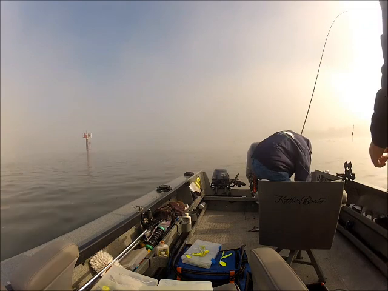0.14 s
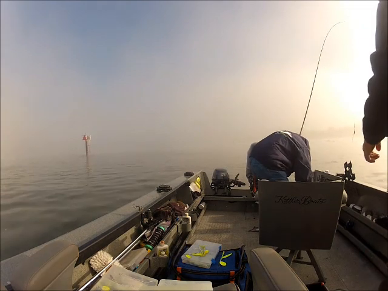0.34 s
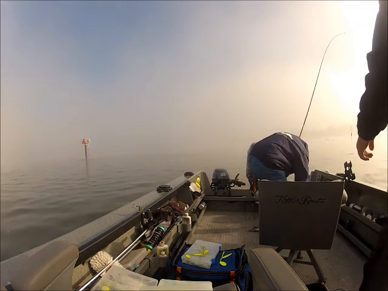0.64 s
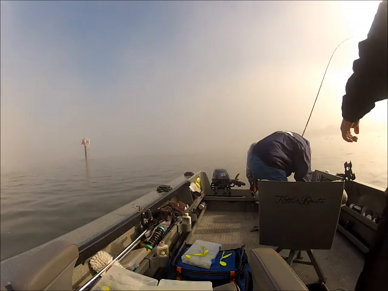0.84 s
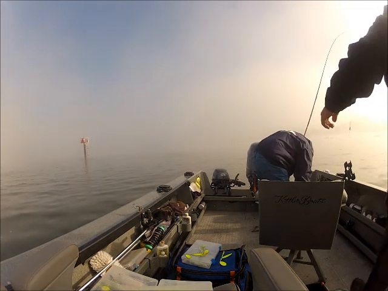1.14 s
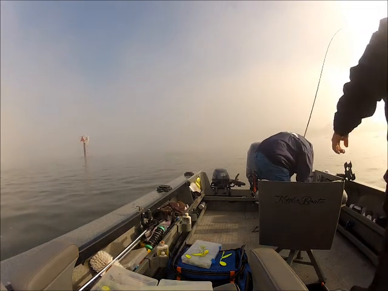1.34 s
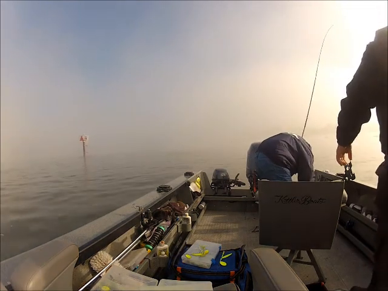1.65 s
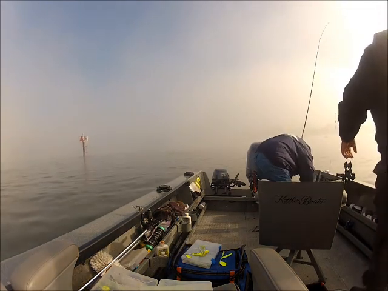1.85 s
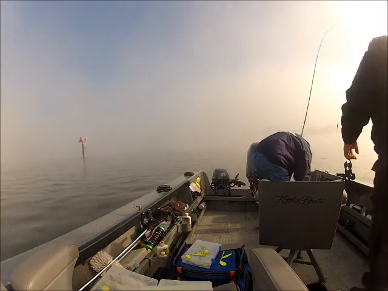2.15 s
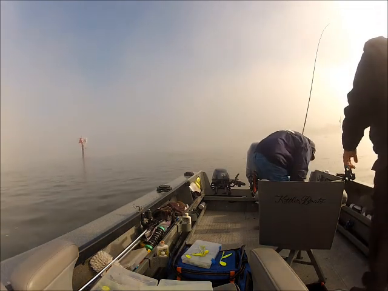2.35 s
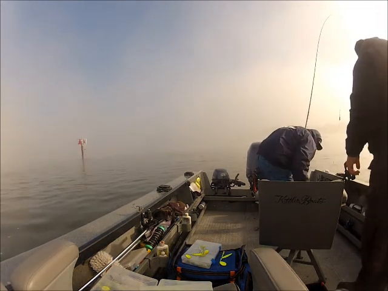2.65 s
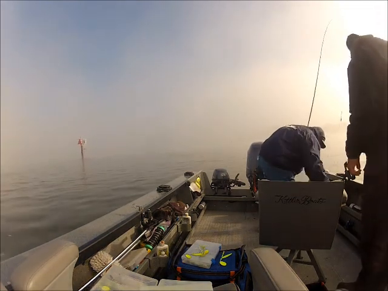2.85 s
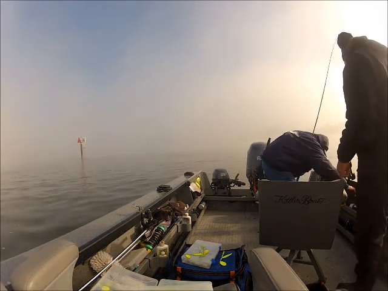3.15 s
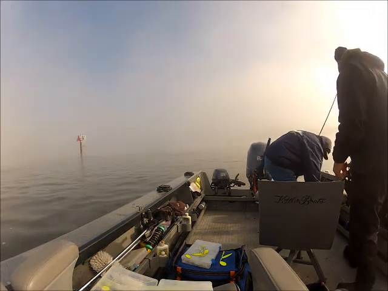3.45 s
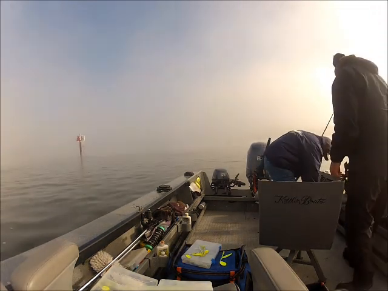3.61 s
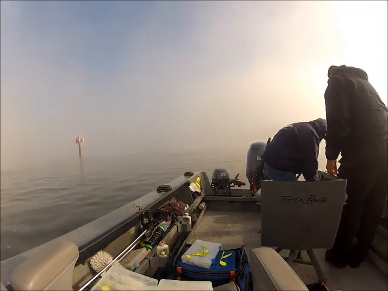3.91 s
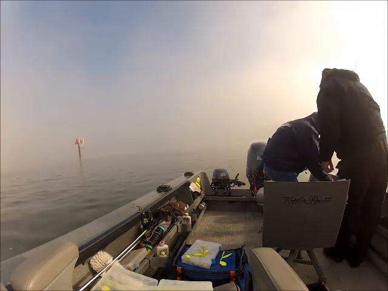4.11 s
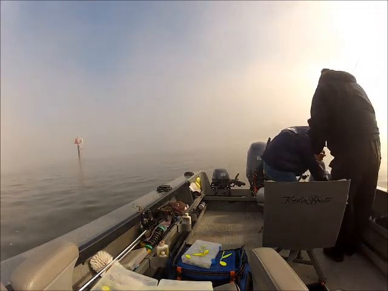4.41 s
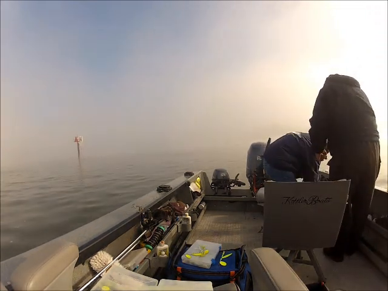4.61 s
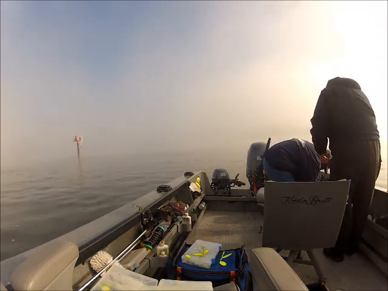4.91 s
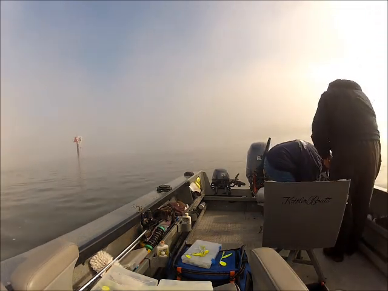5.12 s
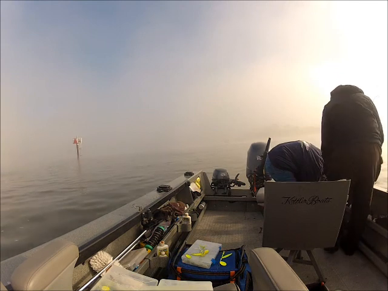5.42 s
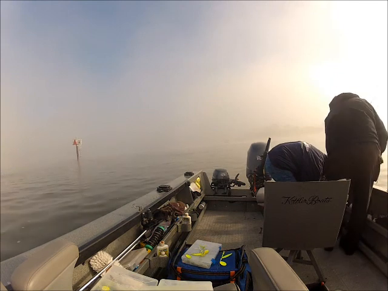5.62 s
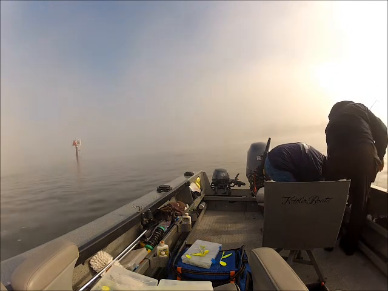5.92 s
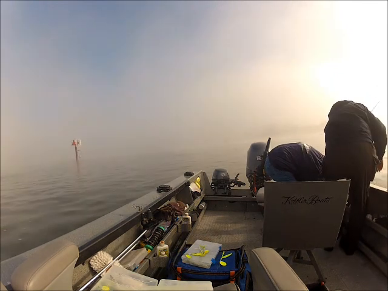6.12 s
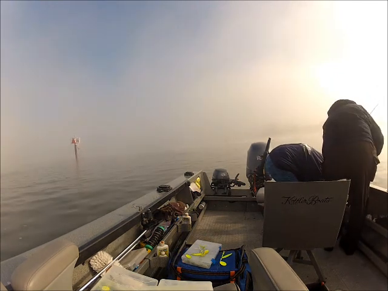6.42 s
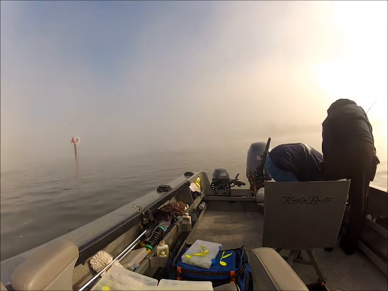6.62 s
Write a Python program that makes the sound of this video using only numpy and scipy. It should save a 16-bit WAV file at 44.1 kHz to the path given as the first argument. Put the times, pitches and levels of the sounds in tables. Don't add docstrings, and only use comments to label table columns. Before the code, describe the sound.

Inside an open metal fishing boat on calm water, an idling motor purrs quietly under a low plate rumble and thin air murmur. Two boot thuds, about a second apart, boom in the floor, with faint scrapes and ticks between. Then comes a bright, short double metal clank, the loudest event, followed by light clacks and sparse taps. The microphone sounds muffled and boxy, in a hard case.

```python
import sys
import numpy as np
from scipy import signal
from scipy.fft import rfft, irfft, next_fast_len
from scipy.io import wavfile
from scipy.ndimage import uniform_filter1d, map_coordinates

SR = 44100
rng = np.random.default_rng(int(sys.argv[2]) if len(sys.argv) > 2 else 0)


def boost(x):
    u = np.asarray(x, float) / 20
    return 10 ** u


def store_pcm(level_fs):
    pcm = np.round(np.clip(level_fs, -1, 1) * 32767).astype(np.int16)
    wavfile.write(sys.argv[1], SR, np.atleast_2d(pcm).T)


N = 298248
T = np.arange(N) / SR

# (time [s], length [s], rocking [dB], drumming [dB])
WEIGHT_SHIFTS = [(0.876, 0.14, 3.5, 10), (2.177, 0.18, 6, 0.5), (2.43, 0.1, -0.5, 11.5),
                 (2.795, 0.085, -3, 8.5), (3.05, 0.094, 4.5, 7), (3.48, .15, 5, 4.5), (4.137, .12, 8.5, 6),
                 (5.65, 0.098, 0, 7), (6.5, 0.24, -2, 6.5)]


def unit(x):
    return x / np.sqrt(np.mean(x ** 2) + 1e-20)


def early(x):
    return x / np.sqrt(np.mean(x[:SR // 25] ** 2))


def along(points, hz):
    f, v = np.transpose(points)
    return np.interp(np.log(hz + 1), np.log(f + 1), v)


def curves(rows):
    s, *cols = np.transpose(rows)
    return [np.interp(T, s, c) for c in cols]


def wobble(rate, size=N):
    knots = rng.standard_normal(int(size * rate / SR) + 4)
    return map_coordinates(knots, [T[:size] * rate])


def bump(s, length):
    return np.exp(-((T - s) / length) ** 2)


def filtered(x, response):
    m = next_fast_len(x.shape[-1] + 8192)
    spectrum = rfft(x, m) * response(np.fft.rfftfreq(m, 1 / SR))
    return irfft(spectrum, m)[..., :x.shape[-1]]


def peaks(modes):
    def response(f):
        total = 0
        for k, (c, w, db) in enumerate(modes):
            total = total + (-1) ** k * boost(db) * 1j * f * w / (c * c - f * f + 1j * f * w)
        return total
    return response


def noise(response):
    return unit(filtered(rng.standard_normal(N), response))


def add(track, s, x):
    part = track[round(s * SR):][:len(x)]
    part += x[:len(part)]


def motor():
    # (time [s], firing rate [Hz], coupling to the hull [dB])
    idling = [(0, 22.19, -54.5), (.28, 22.27, -54.5), (.5, 22.2, -52.5), (.9, 22.1, -45),
              (1.15, 21.98, -52.5), (2.0, 21.9, -51), (2.45, 21.8, -55), (2.85, 21.77, -50.5),
              (3.1, 22.1, -50.5), (3.4, 22.28, -63), (3.85, 22.42, -54), (4.25, 22.2, -50.5),
              (4.45, 22.32, -56), (5.4, 21.94, -55), (5.8, 22.2, -51), (6.76, 22.41, -56.5)]
    # (multiple of the firing rate [1], level [dB], share of the coupling swing [1])
    orders = [(1, -56, .1), (2, -63, .8), (3, -53.5, 0.9), (5, -70, .8), (6, -72.5, .8), (9, -60.5, .1),
              (10, -69.5, .1)]
    firing_hz, coupling_db = curves(idling)
    turn = 2 * np.pi * np.cumsum(firing_hz * (1 + .002 * wobble(3))) / SR
    hum = 0
    for k, db, share in orders:
        level_db = db + 2 + share * (coupling_db + 52.5)
        level_db = level_db + 1.3 * wobble(14) + (1 - share) * 1.5 * wobble(5.6)
        hum = hum + boost(level_db) * np.sin(k * turn + rng.uniform(0, 2 * np.pi))
    return hum


def rocking():
    # (frequency [Hz], level [dB per Hz])
    rumble = [(7.1, -38), (12, -5), (64, -1), (112, -4), (156, -8.5), (216, -9.5), (277, -14.5), (848, -31),
              (1200, -31), (1560, -63.5), (2640, -120)]
    level_db = -58.5 + sum(db * bump(s, length) for s, length, db, _ in WEIGHT_SHIFTS)
    return boost(level_db + 0.9 * wobble(7.8)) * noise(lambda f: boost(along(rumble, f)))


def drumming():
    level_db = -62 + sum(db * bump(s, length) for s, length, _, db in WEIGHT_SHIFTS)
    return boost(level_db + 1.8 * wobble(6)) * noise(peaks([(218.0, 9.3, 0)]))


def air():
    # (frequency [Hz], level [dB per Hz])
    murmur = [(180, -28.5), (300, -1), (506, -9), (546, -10.5), (595, -11.5), (666, -14.5), (844, -13.5),
              (1070, -15.5), (3670, -21), (5140, -26), (5900, -42), (7670, -63.5), (13000, -120)]
    return boost(-66 + 0.36 * wobble(3)) * noise(lambda f: boost(along(murmur, f)))


def scraping():
    # (time [s], length [s], level [dB])
    scrapes = [(.93, .12, -73), (1.55, 0.21, -74.5), (1.79, 0.11, -66), (2.197, 0.096, -76),
               (2.46, 0.042, -73), (2.87, .04, -76), (3.098, 0.17, -76), (3.55, 0.073, -77),
               (4.395, .3, -79), (6.3, 0.14, -84)]
    # (frequency [Hz], width [Hz], level [dB])
    box = [(1930, 200, 0), (2340, 150, 1), (2830, 154, -0.5), (3660, 180, 0.5), (4940, 250, -4)]
    strokes = boost(-77) + sum(boost(db) * bump(s, length) for s, length, db in scrapes)
    rough = boost(-3.5 + 1.9 * wobble(60))
    return strokes * rough * noise(lambda f: peaks(box)(f) ** 2 + peaks([(3200, 4000, -9)])(f))


def blow(modes, colour, noise_db, rise, rattle, length=1):
    # (frequency [Hz], time to fall 60 dB [s])
    dying = [(60, .45), (250, 0.51), (1000, 0.16), (3000, 0.13), (6000, 0.109)]
    t = T[:SR * 2 // 5]
    ring = 0
    for hz, db, t60 in modes:
        swell = 1 - np.exp(-(t / min(4 / hz, 0.017)) ** 2)
        loose = np.clip(rattle * hz / 1500, 0, rattle)
        flutter = (1 + loose * wobble(200, size=len(t))) / np.hypot(1, loose)
        fade = boost(db - 60 * t / (t60 * (length if hz > 400 else 1)))
        ring = ring + fade * swell * flutter * np.sin(2 * np.pi * hz * t + rng.uniform(0, 2 * np.pi))
    hz, s, z = signal.stft(rng.standard_normal(len(t)), SR, nperseg=512, noverlap=384)
    fading_db = along(colour, hz)[:, None] - 60 * s / (length * along(dying, hz)[:, None])
    burst = signal.istft(z * boost(fading_db), SR, nperseg=512, noverlap=384)[1][:len(t)]
    burst = burst * (1 + 1.2 * boost(-60 * t / 0.02))
    mix = early(ring) + boost(noise_db) * early(burst)
    return early(mix * (1 - np.exp(-(t / rise) ** 2)))


def thuds():
    # (time [s], peak [dB], crack [dB])
    boots = [
        (0.718, -22.5, -22),
        (2.031, -23.5, -11.5),
    ]
    # (frequency [Hz], level [dB], time to fall 60 dB [s])
    first_plate = [(68.5, -15.5, 0.28), (87.5, 0.5, 0.28), (113.4, -8, 0.29), (146.3, -19, 0.97),
                   (198, -3, 0.37), (218, 0.5, 0.48), (308.5, 4, 0.11), (377, -9, 0.22), (431, -3, 0.14),
                   (512, -13.5, 0.25), (688, -11, 0.13), (910, -11.5, 0.18), (1094, -18.5, 0.18),
                   (1550, -15, 0.12), (2290, -15.5, 0.14), (3030, -36, .15), (3640, -29, 0.43),
                   (4670, -56, .15)]
    # (frequency [Hz], level [dB], time to fall 60 dB [s])
    second_plate = [(91.4, 8.5, 0.15), (106.7, -6, 0.2), (155, -13.5, 0.48), (192.5, -13, 0.35),
                    (217.4, 1, 0.32), (305, 1.5, 0.15), (348, -11, 0.36), (484, -17.5, 0.4),
                    (640, -26, 0.45), (956, -27, 0.18), (977, -21.5, 0.35), (1576, -16, 0.17),
                    (1936, -14.5, 0.19), (2560, -29, 0.29), (2855, -32, 0.31), (3820, -26, 0.29),
                    (4680, -18, 0.12)]
    # (frequency [Hz], level [dB per Hz])
    thud_colour = [(35, -21.5), (60, -31), (263, -13.5), (728, -14.5), (934, -7.5), (1400, -36),
                   (1570, -25), (1690, -16), (2350, -18), (2580, -16), (3650, -17.5), (4960, -21),
                   (5900, -39), (7670, -77), (13000, -120)]
    out = np.zeros(N)
    for (s, db, crack_db), plate in zip(boots, (first_plate, second_plate)):
        hit = blow(plate, thud_colour, noise_db=crack_db + 5.5, rise=0.00089, rattle=2.2)
        add(out, s - .001, boost(db - 7.5) * hit)
    return out


def ticks():
    # (frequency [Hz], width [Hz], level [dB])
    case = [(949, 200, 4), (2205, 530, 3.5), (3660, 160, 0.5), (4686, 240, -7)]
    # (tap [dB], treble [dB], time to fall 60 dB [s])
    click = (-13.5, 0.61, .11)
    soft_tap = (3.8, -16, 0.09)
    clack = (-15.5, -12.5, 0.108)
    # (time [s], peak [dB], middle resonance [Hz], hardness [dB])
    clicks = [(.7474, -46, 2200, -0.5), (.78, -51, 2290, -2), (0.824, -55.5, 2340, 4),
              (1.215, -60, 1950, 3.5), (2.3678, -54, 2340, -3), (2.6975, -60.5, 2400, -2),
              (2.997, -56.5, 2180, 3.5), (4.0954, -60, 2290, 1), (4.5729, -69, 2450, 4),
              (4.9696, -64, 2194, -1), (6.2661, -62.5, 2050, -0.5), (6.4184, -62, 1660, 0),
              (6.4998, -68, 2320, 0)]
    soft_taps = [(3.0044, -58.5, 2380, -2), (3.0336, -67, 1830, 3), (3.2986, -31.5, 2320, 1),
                 (3.4545, -54, 1800, 0), (3.7937, -57, 1970, -4), (3.881, -64.5, 1500, -6),
                 (4.0306, -56, 2260, 3)]
    clacks = [(3.4252, -37, 2030, -12), (3.907, -54, 2200, 1), (4.0557, -51, 2160, 6),
              (4.341, -55.5, 1200, 8.5), (4.3539, -53.5, 2000, -8), (4.3696, -59, 1160, -6)]
    out, t = np.zeros(N), T[:SR // 6]
    for (low_db, treble_db, t60), rows in ((click, clicks), (soft_tap, soft_taps), (clack, clacks)):
        for s, db, hz, hard_db in rows:
            high_db = treble_db + hard_db
            fade = boost(-60 * t / np.clip(t60, .01, .5)) * (1 - np.exp(-t / 0.0017))
            puff = early(rng.standard_normal(len(t)) * fade) * 0.18
            tick = 0
            for (c, w, g), d in zip([(hz, 260, 0)] + case[2:], (0, high_db - 3.5, high_db - 6)):
                tick = tick + filtered(puff, lambda f: peaks([(c, 2.2 * w, g / 2 + d / 2)])(f) ** 2)
            broad = peaks([(3500, 4200, 0)])
            snap = filtered(puff * boost(-60 * t / 0.31),
                            lambda f: boost(high_db - 4.5) * broad(f) ** 2 / (1 + (f / 5300) ** 12))
            tone = np.sin(2 * np.pi * case[0][0] * rng.normal(1, 0.033) * t)
            tap = boost(low_db - 17) * fade * (1 + 0.79 * wobble(273, size=len(t))) * tone
            add(out, s - .002, boost(db + 20) * (tick + snap + tap))
    return out


def swells():
    # (time [s], frequency [Hz], level [dB], length [s])
    pushes = [(0.9, 84, -47, 0.1), (2.826, 54, -43, 0.06), (4.19, 27, -40, 0.165), (4.12, 106, -48, 0.07),
              (4.527, 25, -45.5, 0.16), (5.66, 88, -53, 0.11), (3.0, 150, -58, .09), (2.1, 260, -52, 0.065),
              (4.12, 145, -54.5, .1), (4.24, 68, -48, .12)]
    # (time [s], frequency [Hz], level [dB], length [s])
    squeaks = [(4.285, 2340, -71, 0.06), (2.175, 8000, -68, .03), (2.305, 8400, -67, .025)]
    out = np.zeros(N)
    for s, hz, db, length in pushes + squeaks:
        out += boost(db - 25 * ((T - s) / length) ** 2) * np.sin(2 * np.pi * hz * T)
    return out


def clanks():
    # (time [s], peak [dB], hull [dB], low ring [dB], ring length factor [1])
    strikes = [
        (3.297, -20.5, -5, -5.5, 0.72),
        (3.342, -11, -21.5, -15, 0.92),
        (3.425, -43, -22, -9, 0.85),
    ]
    # (frequency [Hz], level [dB], time to fall 60 dB [s])
    metal = [(218, -9, 0.41), (481.7, -16, .3), (647.6, -9, 0.1717), (1090, -11.5, 0.172), (921.2, -8, .15),
             (963, -7.5, .12), (1240, -41.5, .9), (1576, -4, 0.11), (1704, -8, .13), (1880, -7, 0.16),
             (2030, -16.5, 0.15), (2104, -6, .1), (1920, -9, 0.15), (2288, -4.5, 0.15), (2728, -13.5, 0.1),
             (3120, -10.5, 0.063), (3680, -3, 0.07), (4250, -21, 0.046), (5070, -22, .09)]
    # (frequency [Hz], level [dB per Hz])
    clank_colour = [(35, -69.5), (60, -35.5), (213, -6), (248, -15.5), (477, -12), (546, -24.5), (952, -6),
                    (1330, -17), (1570, -18.5), (2260, -3), (2540, -17.5), (3720, -16.5), (5900, -30),
                    (7670, -76), (13000, -120)]
    out = np.zeros(N)
    for s, db, hull_db, low_db, length in strikes:
        modes = []
        for hz, g, t60 in metal:
            extra_db = hull_db + 20.5 if hz < 400 else low_db + 13.5 if hz < 1100 else 0
            modes.append((hz, g + extra_db, t60))
        hit = blow(modes, clank_colour, noise_db=0, rise=0.0026, rattle=.35, length=length)
        add(out, s - .002, boost(db - 12.0) * hit)
    return out


def thinned(x):
    hz, _, z = signal.stft(x, SR, nperseg=1024)
    power = uniform_filter1d(np.abs(z) ** 2, size=7, axis=0)
    power = uniform_filter1d(power, size=3, axis=1)
    usual = np.median(power, axis=1)[:, None]
    margin_db = np.interp(hz, [12400, 12900, 13700, 14700, 15570, 15600], [-9, -1.0, -7, -13, -5, 23.0])
    loud_enough = power > usual * boost(margin_db)[:, None]
    return signal.istft(z * loud_enough, SR, nperseg=1024)[1][:N]


def scene():
    hull = rocking() + drumming() + air() + scraping()
    return np.tile(motor() + hull + thuds() + ticks() + swells() + clanks(), (2, 1))


def low_pass(x):
    return signal.sosfilt(signal.butter(12, 16480, fs=SR, output="sos"), x)


def record(dry):
    # (frequency [Hz], level [dB per Hz])
    side_hiss = [(18, -49), (30, -9), (130, -4), (382, -5.5), (696, -11.5), (4210, -13.5), (5480, -17),
                 (6040, -29), (7140, -15.5), (9300, -25.5), (12100, -69), (20500, -120)]
    hold_hz, top_hz = 12000, 16400
    x = filtered(dry[0], lambda f: 1 / np.sinc(np.minimum(f, 6000) / hold_hz) / (1 + (f / 5850) ** 60))
    x = x * (1 + 2 * np.cos(2 * np.pi * hold_hz * T))
    top_slope = lambda f: (f < top_hz) * boost(-.018 * np.maximum(f - 15200, 0))
    held = filtered(x, lambda f: np.sinc(f / hold_hz) * top_slope(f))
    x = thinned(held + boost(-82.5) * noise(lambda f: f < top_hz))
    treble = uniform_filter1d(filtered(x, lambda f: f > 1500) ** 2, size=2048)
    side = boost(-79) * noise(lambda f: boost(along(side_hiss, f)))
    side = side * (treble < boost(-58) ** 2)
    return low_pass(np.array([x + side, x - side]))


dry = scene()
out = record(dry)
store_pcm(out)
```